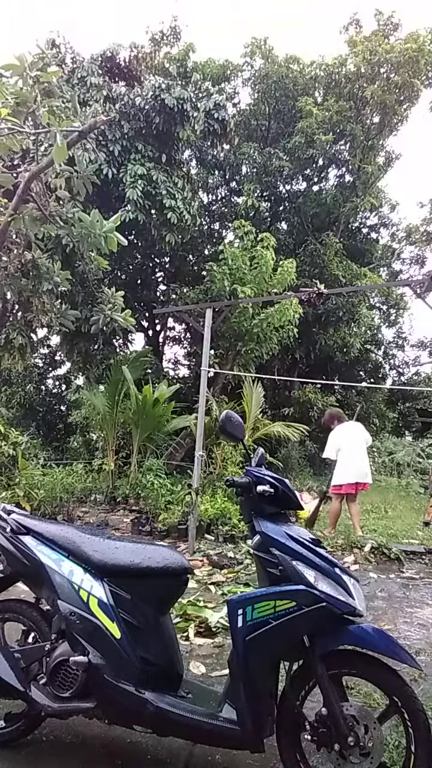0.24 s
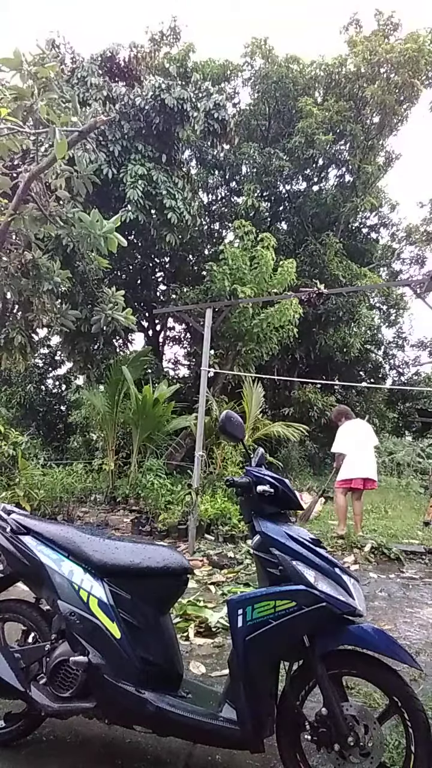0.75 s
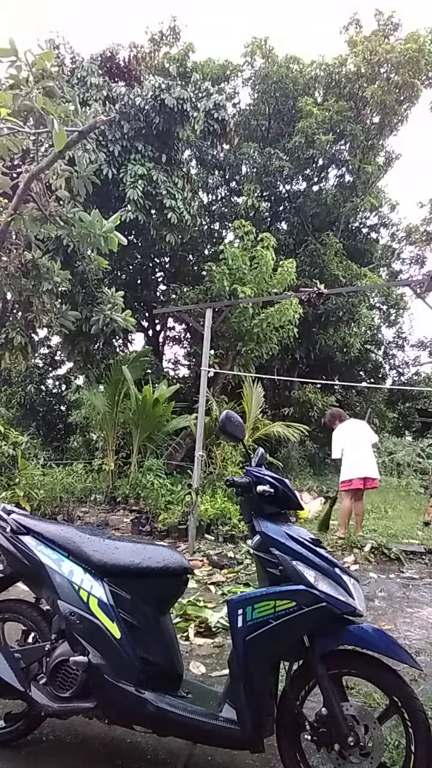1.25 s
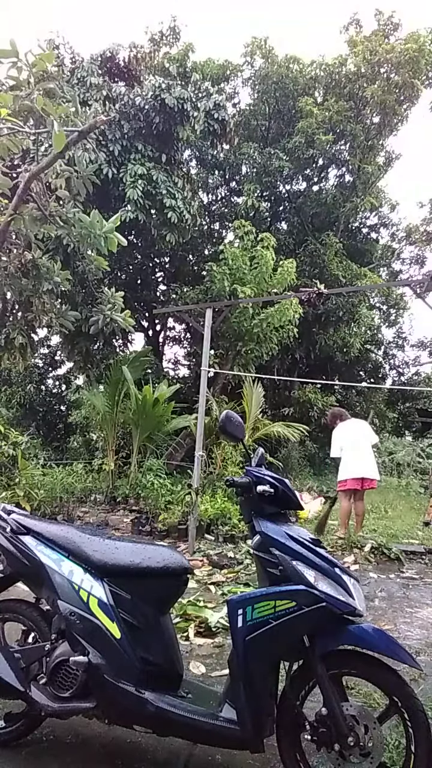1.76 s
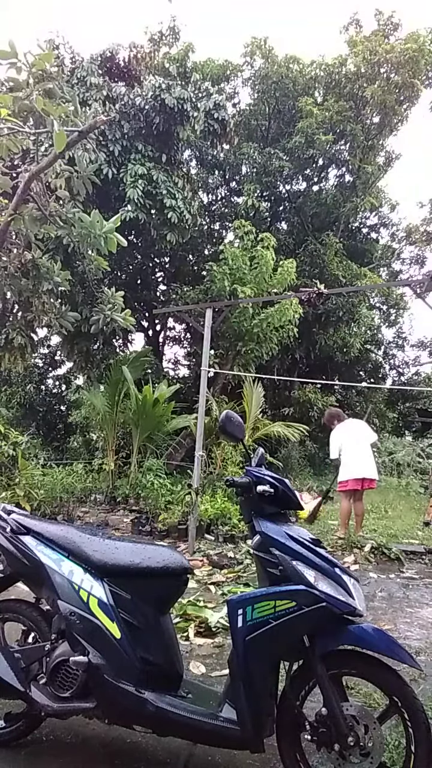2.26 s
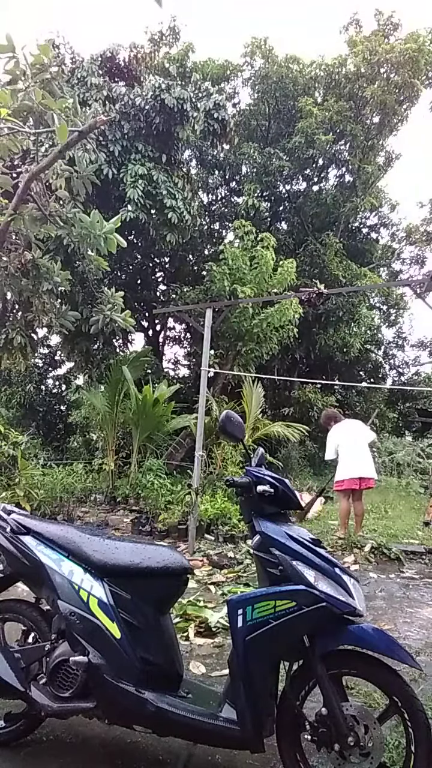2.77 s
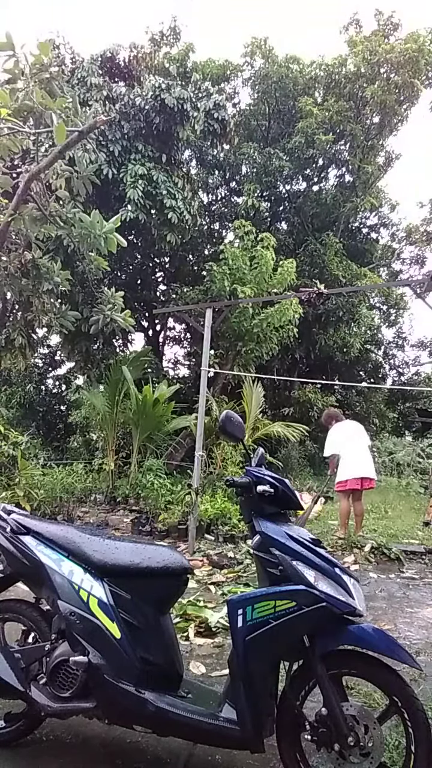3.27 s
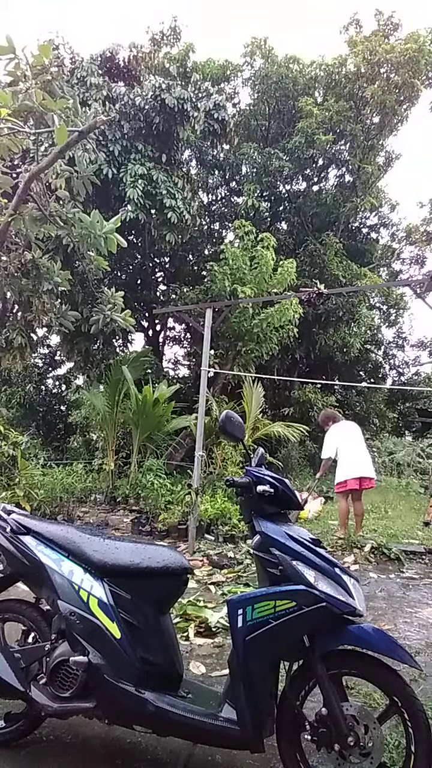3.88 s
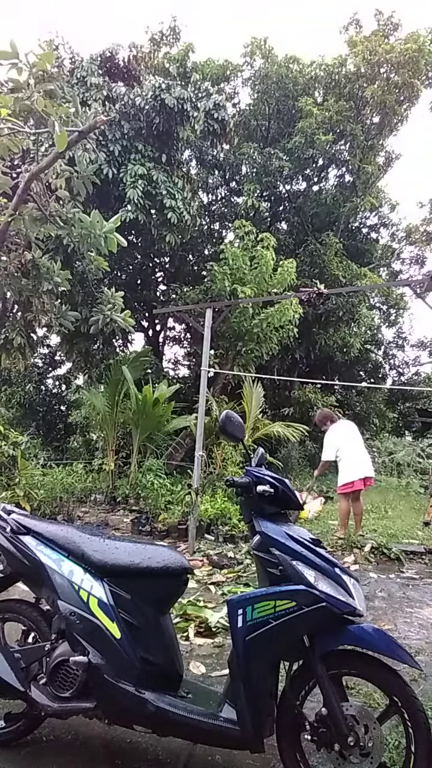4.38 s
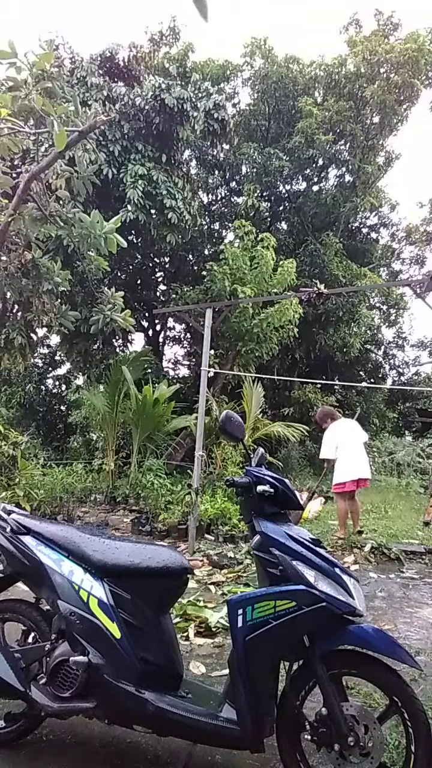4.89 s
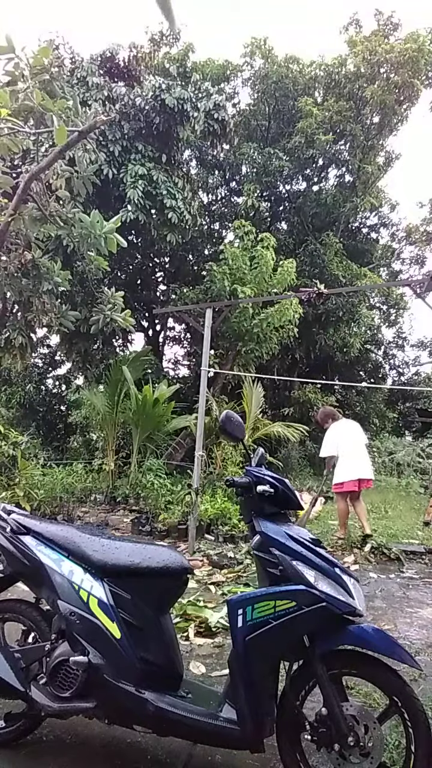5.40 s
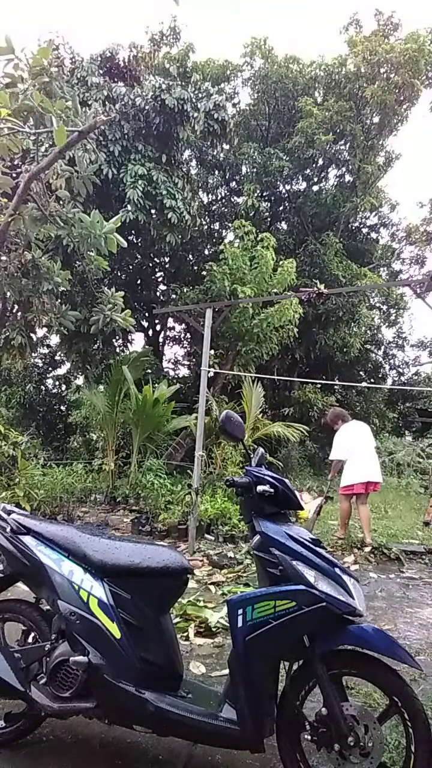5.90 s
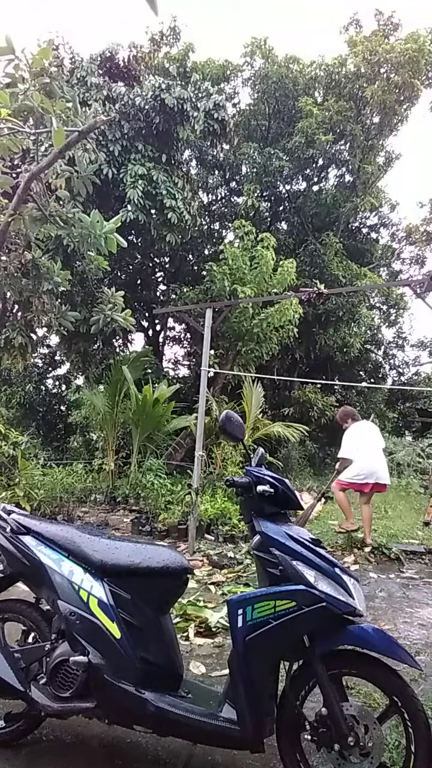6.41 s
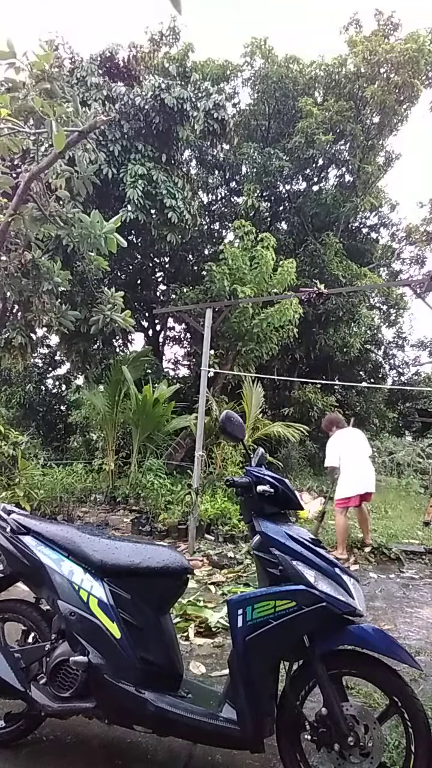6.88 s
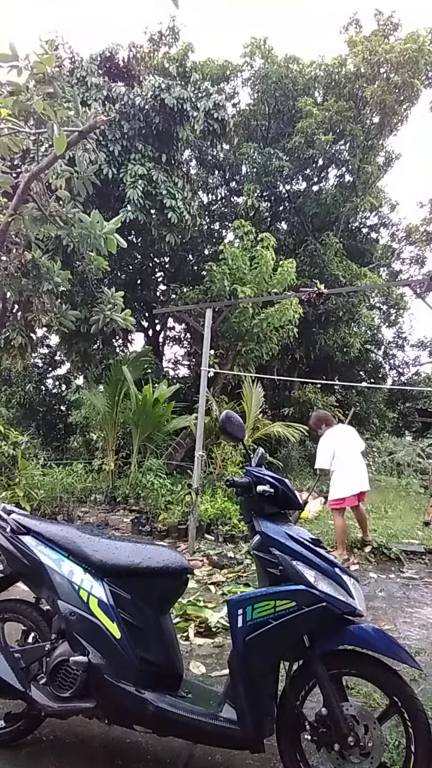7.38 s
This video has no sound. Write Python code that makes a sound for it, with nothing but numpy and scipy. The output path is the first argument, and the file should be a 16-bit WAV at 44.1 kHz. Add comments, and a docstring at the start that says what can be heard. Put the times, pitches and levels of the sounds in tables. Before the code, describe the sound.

Outdoors in a rainy yard, a stiff broom scrapes wet leaves and grit some metres away, about twelve uneven, dry, crackly strokes with short gaps. Rain hisses and drums on a roof behind it, broken into watery flickering patches by noise reduction. A few bright drops ping close by, and one soft thud bumps the microphone midway. Faint steady hiss underneath.

```python
"""In a yard near a roof, a stiff broom sweeps wet leaves some metres from a phone while steady rain falls.
The broom is a mass of tiny clicks; rain, roof drumming and rumble are shaped noise. The phone's noise
suppressor lets only flickering patches of them through, and tones of wandering phase flare up among them.
Near drops ping and splash, one dull knock hits the phone, and a faint hiss lies under all.
Of the phone's two microphone ports, the left hears more middle and the right more treble."""
import sys
import numpy as np
from scipy import signal
from scipy.fft import rfft, irfft, next_fast_len
from scipy.io import wavfile
from scipy.ndimage import uniform_filter1d, map_coordinates

SR = 44100
rng = np.random.default_rng(int(sys.argv[2]) if len(sys.argv) > 2 else 0)


def to_wav(s):
    """Save 16-bit WAV."""
    ch = np.atleast_2d(s).T  # columns
    pcm = np.round(np.clip(ch, -1, 1) * 32767)  # PCM
    wavfile.write(sys.argv[1], SR, pcm.astype(np.int16))


N = 337365  # length in samples

# broom strokes before the suppressor: full contact from t/s, rise t/s, hold t/s, fall t/s,
# scrape level/dB, hiss level/dB relative to the scrape
BROOM_STROKES = [(0.0, 0.19, 0.0021, 0.1, -44.5, 3.5), (0.425, 0.21, 0.044, 0.15, -45, 1),
                 (1.388, 0.052, 0.078, 0.038, -53, 7.5), (1.822, 0.053, 0.13, 0.2, -45, 2),
                 (2.704, 0.34, 0.03, 0.13, -50.5, 7), (2.961, 0.018, 0.015, 0.096, -47.5, 3),
                 (3.06, 0.1, 0.073, 0.27, -45, 2.5), (3.897, 0.24, 0.027, 0.18, -39.5, -1.5),
                 (4.572, 0.22, 0.09, 0.27, -44, 3), (5.344, 0.17, 0.027, 0.26, -44.5, 2.5),
                 (5.951, 0.076, 0.069, 0.29, -51.5, 6.5), (7.025, 0.32, 0.061, 0.3, -38.5, -2)]
# colour of the bristle clicks: f/Hz, level/dB
BRISTLE_COLOUR = [(880, -43), (1500, -42), (2150, -4), (2480, -14), (2860, 7.5), (3490, 3), (4470, 11.5),
                  (5100, 10), (12100, 4.5), (14500, -4.5)]
STROKE_EDGE_DB, STROKE_CURVE = 31.5, 1.27  # loss at the end of a rise or fall; how round the shoulders are

# near drops: t/s, ping level/dB, pitch f/Hz, time for the splash to fall 60 dB t/s,
# splash level/dB and wide tick level/dB relative to the drop, splash spread as a pitch ratio
NEAR_DROPS = [(1.005, -36, 5760, 0.2, -7.5, -30, 1.12), (1.265, -48, 3350, 0.05, -2, -3, 1.1),
              (2.191, -45, 8900, 0.17, -10, 3, 1.12), (4.96, -50, 11600, 0.18, -15.5, -13, 1.08),
              (5.198, -38.5, 6940, 0.11, -12, 2, 1.12), (5.86, -47, 6300, 0.06, -1, -12, 1.09),
              (6.213, -44, 5660, 0.061, -10, -23, 1.08), (6.366, -34.5, 4970, 0.32, -8.5, -37, 1.157),
              (6.869, -39, 6090, 0.2, -5.5, -23, 1.09), (7.349, -54, 9250, 0.23, -5, 10, 1.12)]
PING_RISE_S, PING_T60_S = 0.0012, 0.022  # T60: time to fall 60 dB
TICK_RISE_S, TICK_T60_S = 0.007, 0.04
CRACKLE_DB, CRACKLE_S = 2, 0.0018  # a splash breaks into grains: how uneven, and how long

# one dull knock on the phone
THUMP_S, THUMP_DB, THUMP_HZ, THUMP_T60_S = 3.386, -38.5, 113, 0.066

# loud narrow patches that flare through: start t/s, pitch f/Hz, level/dB, nominal length t/s
LOUD_FLARES = [(0.01, 1940, -55.5, 0.034), (0.118, 705, -55, 0.068), (0.12, 1386, -56.5, 0.04),
               (0.17, 1237, -61, 0.084), (0.265, 1996, -50, 0.04), (0.4, 890, -57, 0.068),
               (0.585, 2970, -59.5, 0.096), (0.715, 676, -58, 0.095), (0.835, 2530, -52, 0.019),
               (0.86, 1750, -54.5, 0.036), (0.259, 1130, -53, 0.13), (0.285, 5020, -56.5, 0.1),
               (0.399, 2580, -54.5, 0.06), (0.419, 4250, -63, 0.062), (0.418, 1390, -47.5, 0.036),
               (0.452, 683, -53, 0.06), (0.466, 1374, -51.5, 0.12), (0.554, 1456, -48, 0.11),
               (0.611, 1680, -48.5, 0.044), (0.831, 1840, -47, 0.021), (0.956, 5560, -58, 0.11),
               (0.956, 7300, -55, 0.04), (0.957, 10000, -58.5, 0.15), (0.955, 670, -53, 0.021),
               (0.955, 1678, -53, 0.053), (0.985, 673, -52.5, 0.049), (1.015, 480, -57, 0.048),
               (1.04, 940, -63, 0.025), (1.098, 2380, -58, 0.028), (1.098, 2830, -64, 0.13),
               (1.1, 1162, -47.5, 0.038), (1.108, 1370, -48.5, 0.093), (1.097, 1893, -49, 0.061),
               (1.14, 8300, -53, 0.042), (1.205, 1050, -57.5, 0.032), (1.215, 3600, -54, 0.03),
               (1.245, 2250, -61.5, 0.15), (1.251, 3590, -56, 0.079), (1.345, 2820, -58.5, 0.032),
               (1.365, 2045, -53, 0.048), (1.44, 1095, -54, 0.021), (1.44, 1980, -57, 0.04),
               (1.55, 950, -60, 0.042), (1.55, 1720, -63, 0.096), (1.62, 1800, -52.5, 0.073),
               (1.62, 2690, -60.5, 0.04), (1.255, 1463, -44.5, 0.037), (1.379, 695, -54.5, 0.066),
               (1.43, 3800, -57, 0.1), (1.592, 937, -51.5, 0.045), (1.621, 1568, -50, 0.05),
               (1.809, 1140, -46.5, 0.052), (1.82, 5600, -54, 0.11), (1.91, 4450, -54, 0.09),
               (1.937, 7000, -54, 0.056), (2.218, 1612, -47.5, 0.044), (2.28, 2680, -55.5, 0.082),
               (2.28, 5750, -60, 0.11), (2.285, 1492, -43.5, 0.053), (2.326, 1470, -45.5, 0.096),
               (2.482, 5750, -58, 0.031), (2.495, 2720, -55.5, 0.056), (2.5, 4950, -56, 0.1),
               (2.525, 1744, -47, 0.042), (2.488, 1700, -57, 0.058), (2.49, 1980, -57, 0.04),
               (2.545, 455, -48, 0.092), (2.56, 1150, -54, 0.04), (2.62, 923, -58, 0.065),
               (2.6, 11800, -58, 0.037), (2.705, 2095, -60, 0.074), (2.765, 1690, -58.5, 0.051),
               (2.81, 1415, -56.5, 0.084), (2.84, 1820, -59, 0.033), (2.855, 904, -55, 0.025),
               (2.885, 1570, -56, 0.025), (2.96, 1706, -62, 0.2), (2.965, 2250, -59, 0.045),
               (3.14, 800, -53, 0.031), (3.18, 1550, -55, 0.05), (3.225, 2300, -55, 0.11),
               (3.355, 2000, -52, 0.028), (3.36, 1720, -52, 0.034), (3.415, 1340, -51, 0.053),
               (3.515, 670, -51, 0.036), (3.63, 2300, -60, 0.085), (2.645, 474, -51.5, 0.034),
               (2.82, 610, -56.5, 0.061), (2.96, 1435, -53, 0.078), (2.975, 1125, -48, 0.039),
               (3.02, 202, -58, 0.058), (3.082, 2684, -48, 0.066), (3.097, 215.4, -48, 0.15),
               (3.21, 374.5, -52, 0.12), (3.236, 2635, -52, 0.21), (3.252, 5860, -53.5, 0.054),
               (3.26, 1710, -47.5, 0.051), (3.312, 1500, -49.5, 0.091), (3.344, 406, -50.5, 0.05),
               (3.377, 570, -49.5, 0.036), (3.425, 100.5, -47, 0.11), (3.515, 1148, -48.5, 0.084),
               (3.547, 449, -48.5, 0.073), (3.624, 1927, -51, 0.038), (3.633, 782, -48, 0.031),
               (3.722, 1157, -49.5, 0.17), (3.759, 397.6, -52, 0.22), (3.763, 4960, -50, 0.068),
               (3.768, 7200, -56, 0.061), (3.806, 1910, -48.5, 0.057), (3.854, 405.8, -50.5, 0.22),
               (3.9, 3040, -50.5, 0.12), (3.976, 1355, -50, 0.047), (3.994, 334, -49.5, 0.074),
               (4.011, 1168, -47.5, 0.082), (4.082, 667, -52, 0.085), (4.108, 469, -52.5, 0.11),
               (3.93, 2300, -50.5, 0.037), (4.065, 1964, -53, 0.05), (4.135, 1720, -55, 0.033),
               (4.187, 1730, -51, 0.032), (4.195, 1405, -55, 0.06), (4.235, 1750, -56, 0.043),
               (4.29, 1130, -62, 0.04), (4.305, 2134, -60.5, 0.073), (4.41, 112, -57, 0.018),
               (4.516, 416, -52, 0.056), (4.36, 1660, -55.5, 0.053), (4.575, 1676, -51.5, 0.067),
               (4.575, 2340, -57, 0.08), (4.575, 4480, -51, 0.066), (4.63, 1544, -52, 0.12),
               (4.635, 1340, -56, 0.05), (4.675, 2040, -50.5, 0.069), (4.685, 1158, -51, 0.096),
               (4.71, 1695, -56, 0.083), (4.81, 1670, -53.5, 0.071), (4.717, 815, -51.5, 0.063),
               (4.764, 1130, -49, 0.042), (4.892, 1696, -52, 0.035), (4.95, 1352, -48.5, 0.085),
               (5.068, 950, -51, 0.044), (5.121, 1144, -49, 0.033), (5.181, 757, -51.5, 0.096),
               (5.196, 4900, -47, 0.02), (5.2, 2860, -56, 0.023), (5.229, 1150, -47.5, 0.085),
               (5.198, 1546, -49.5, 0.063), (5.249, 2640, -49, 0.068), (5.252, 1940, -46, 0.047),
               (4.875, 897, -57.5, 0.025), (4.965, 1840, -55, 0.025), (5.15, 1804, -50.5, 0.06),
               (5.225, 479, -56, 0.061), (5.315, 1110, -48, 0.028), (5.325, 1850, -52, 0.06),
               (5.33, 794, -50, 0.065), (5.35, 1385, -54, 0.057), (5.395, 465, -55, 0.047),
               (5.44, 1665, -55, 0.06), (5.46, 687, -61, 0.12), (5.515, 485, -54, 0.042),
               (5.56, 1440, -64.5, 0.08), (5.58, 723, -54, 0.04), (5.62, 1125, -63, 0.073),
               (5.665, 1685, -53, 0.023), (5.7, 385, -54.5, 0.043), (5.79, 2660, -56.5, 0.038),
               (5.8, 503, -55.5, 0.03), (5.82, 1395, -53, 0.054), (5.875, 472, -53.5, 0.042),
               (5.62, 714, -52, 0.12), (5.696, 2450, -57.5, 0.077), (5.77, 1200, -45, 0.048),
               (5.768, 1950, -54, 0.065), (5.777, 1567, -53.5, 0.097), (5.88, 1510, -51.5, 0.045),
               (5.93, 1930, -53.5, 0.1), (6.03, 1510, -55, 0.026), (6.035, 862, -60, 0.054),
               (6.15, 1730, -51, 0.04), (6.215, 1158, -57, 0.11), (6.225, 100, -55.5, 0.071),
               (6.23, 2970, -59, 0.049), (6.285, 1653, -49.5, 0.04), (6.33, 1494, -54, 0.11),
               (6.525, 2250, -57.5, 0.045), (6.63, 2030, -58, 0.042), (6.645, 2370, -62, 0.044),
               (6.71, 2666, -57, 0.066), (6.755, 1540, -53, 0.045), (6.15, 1237, -50.5, 0.037),
               (6.364, 662, -51, 0.06), (6.431, 1360, -49.5, 0.17), (6.43, 3230, -52.5, 0.03),
               (6.456, 2970, -59, 0.071), (6.529, 469, -49.5, 0.061), (6.532, 1166, -50, 0.15),
               (6.707, 555, -50, 0.047), (6.746, 1950, -50, 0.038), (6.753, 571, -53.5, 0.05),
               (6.827, 848, -46, 0.015), (6.868, 3690, -51.5, 0.039), (6.863, 2710, -51, 0.026),
               (6.912, 237.6, -56, 0.21), (6.92, 2800, -56, 0.041), (6.956, 1560, -53, 0.031),
               (6.962, 596, -52.5, 0.034), (6.97, 1320, -52, 0.025), (7.015, 2080, -51.5, 0.11),
               (7.035, 2800, -52, 0.068), (7.08, 2470, -55, 0.081), (7.14, 239, -66, 0.12),
               (7.17, 545, -57, 0.049), (7.26, 1640, -58, 0.032), (7.29, 1280, -53, 0.032),
               (7.34, 204, -57, 0.1), (7.345, 1130, -57, 0.027), (7.505, 1070, -56, 0.053),
               (7.56, 1386, -53.5, 0.093), (7.6, 1164, -56.5, 0.11), (7.015, 257, -53.5, 0.13),
               (7.123, 1360, -47, 0.018), (7.225, 5160, -59, 0.043), (7.225, 3660, -59, 0.12),
               (7.33, 3640, -63.5, 0.2), (7.446, 6560, -58, 0.098), (7.52, 3740, -62, 0.1),
               (7.339, 1900, -49, 0.064), (7.45, 2050, -45, 0.034), (7.435, 2620, -51.5, 0.026),
               (7.459, 1686, -51, 0.056), (7.517, 731, -45, 0.033), (7.529, 2890, -51, 0.15)]
WEAK_FLARES, WEAK_HZ = 60, (680, 2200)  # how many weak flares; their pitch range
WEAK_DB, WEAK_S = (-62, -56.5), (0.04, 0.11)  # ranges of their level and length
FLUTTER, STEADY_S = 0.82, 0.41  # flutter depth of the shortest flares; length over which it shrinks

# slow level of the background before LIFT_DB: t/s, drone level/dB, roof drumming level/dB,
# rain hiss level/dB, upper hiss level/dB relative to the rain hiss
YARD_LEVEL = [(0.0, -52, -54, -58.5, 7.5), (0.43, -70.5, -56.5, -57, 4.5), (1.96, -72, -59, -64, -15.5),
              (2.53, -62.5, -57, -68, 11.5), (2.56, -55, -72, -62, -8), (2.94, -72, -55.5, -66.5, -2),
              (3.22, -61, -57.5, -55, -6.5), (3.41, -43, -53, -66, -21), (3.52, -62.5, -66, -68, 15),
              (3.58, -37, -55.5, -60.5, -19), (3.68, -73, -52.5, -75.5, 2), (3.77, -43.5, -61.5, -70, 8.5),
              (3.94, -45.5, -50.5, -59, 14), (4.06, -63, -54, -66.5, 6), (4.32, -72, -58.5, -66.5, -3),
              (4.56, -57, -58, -60, -40), (5.05, -76.5, -55.5, -66, 1), (5.26, -54, -54.5, -53.5, -5.5),
              (5.94, -57, -60, -65, -5), (6.2, -89, -54.5, -61.5, -9), (6.56, -56, -59.5, -69, 1.5),
              (6.69, -82, -50, -69, -6), (6.71, -66, -70, -61, -3), (6.84, -85, -47, -68, -14),
              (7.01, -64, -54.5, -46.5, 8.5), (7.37, -45.5, -53, -61.5, -2), (7.65, -77, -61.5, -62, -24)]
# slow level of the far rumble before LIFT_DB: t/s, level/dB
FAR_RUMBLE_LEVEL = [(0.0, -70), (0.04, -55), (0.77, -55.5), (0.81, -50), (0.94, -72), (1.45, -54),
                    (1.49, -71), (2.43, -76.5), (2.85, -63), (2.96, -79), (3.26, -45.5), (3.37, -60),
                    (3.39, -47.5), (3.68, -57.5), (4.6, -68.5), (4.79, -57), (5.39, -70.5), (5.69, -51),
                    (6.03, -62.5), (6.07, -55), (7.01, -66), (7.05, -56), (7.5, -56), (7.65, -53)]
# colour of the far rumble: f/Hz, level/dB
RUMBLE_COLOUR = [(18, -51), (30, -35), (50, -5), (66, 0), (86, 4), (115, -0.5), (170, -21), (220, -39),
                 (370, -120)]
# colour of the low drone: f/Hz, level/dB
DRONE_COLOUR = [(100, -56), (170, -11.5), (280, 1), (389, 6), (465, 7.5), (581, -1.5), (620, -6.5),
                (810, -60), (1360, -120)]
# roof resonances: f/Hz, width f/Hz, level/dB
ROOF_MODES = [(662, 97, 19.5), (1132, 74, 24.5), (1410, 146, 25.5), (1653, 94, 20.5)]
# colour of the rain hissing on leaves: f/Hz, level/dB
RAIN_COLOUR = [(1350, -79), (2300, 8), (2680, 9), (4230, 8.5), (4890, 9.5), (5800, 9.5), (6410, 7.5),
               (11800, -1), (13400, -2.5), (14500, -30)]
HISS_SPLIT_HZ = 8300  # border between lower and upper rain hiss
# colour of the faint, held-down rain: f/Hz, level/dB
BED_COLOUR = [(71, 0), (120, 4), (284, -12.5), (1530, -3), (1700, 12), (2480, -14.5), (5760, -26),
              (8440, -67), (11400, -13.5), (13400, -47), (14500, -56)]

# the whole background sags and comes back: back at t/s, length t/s before DIP_STRETCH,
# depth level/dB before DIP_SHARE
BACKGROUND_DIPS = [(0.122, 0.13, 3), (0.191, 0.2, 6), (0.271, 0.065, 7.5), (0.396, 0.085, 7),
                   (0.695, 0.092, 5), (0.957, 0.12, 4.5), (1.103, 0.026, 18), (1.25, 0.078, 4),
                   (1.368, 0.029, 3.5), (1.544, 0.025, 5.5), (1.587, 0.19, 1), (1.803, 0.095, 5.5),
                   (2.045, 0.0091, 14), (2.195, 0.096, 2.5), (2.28, 0.038, 3.5), (2.444, 0.035, 6),
                   (2.493, 0.032, 7), (2.665, 0.024, 4), (2.829, 0.019, 4), (2.946, 0.014, 4.5),
                   (3.044, 0.021, 4), (3.521, 0.032, 5.5), (3.614, 0.073, 2.5), (3.738, 0.031, 5),
                   (4.332, 0.057, 8), (4.433, 0.0076, 16), (4.899, 0.089, 3.5), (4.958, 0.049, 6),
                   (5.064, 0.043, 6), (5.122, 0.024, 2), (5.2, 0.058, 3.5), (5.673, 0.1, 5.5),
                   (5.78, 0.017, -0.5), (5.94, 0.056, 2), (6.147, 0.034, 5.5), (6.218, 0.016, 9.5),
                   (6.327, 0.044, 5.5), (6.723, 0.03, 15), (6.823, 0.025, 7), (7.346, 0.1, 4.5),
                   (7.446, 0.099, 4.5)]
DIP_RETURN_S, DIP_STRETCH = 0.0054, 1.96  # time to come back; factor on the listed length
SURGE, SURGE_S = 0.052, 0.0091  # overshoot after a dip as a share of its depth; how long it lasts
# one value each for rumble, drone, roof, lower hiss, upper hiss, faint rain:
DIP_SHARE = 0.49, 2.3, 1.45, 2.73, 3, 2.2  # how deeply each follows the dips
DIP_BLUR_S = 0.001, 0.001, 0.001, 0.016, 0.012, 0.004  # how softly each follows them
LIFT_DB = -0.7, -3, -4.5, 5.4, 9, -1.4  # added to the slow level
FLICKER_DB, FLICKER_RATE = (2.5, 5.1, 4.85, 4.45, 3.1, 1.5), 12  # random swells; knots a second

# colour of the even hiss under all: f/Hz, level/dB
FLOOR_COLOUR = [(100, 5.5), (250, -1), (600, -6), (1500, -3), (3000, -4.5), (6000, -12.5), (11000, -22.5),
                (14300, -20)]
FLOOR_DB = -70.5

# how alike left and right are, 1 for the same; below 0 counts as 0: f/Hz, likeness
PORT_LIKENESS = [(60, 1), (130, 0.97), (290, 0.95), (620, 0.81), (1360, -0.29), (2960, 0.094), (6470, -0.6),
                 (14100, -0.42)]
# left port minus right port: f/Hz, level/dB
PORT_DIFFERENCE = [(60, 2.5), (110, 0), (200, 1.5), (370, 0), (680, 3), (1250, 7), (2290, 4.5), (4190, 2.5),
                   (7690, 1.5), (14100, -22.5)]
TOP_HZ, LOW_CUT_HZ = 14280, 40  # limits of what is heard


def broom():
    """Bristles flick over grit and leaves: dense tiny clicks of uneven size, in a scrape and a hiss range."""
    clicks = at_ports(rng.standard_normal((2, N)) * amp(1.8 * rng.exponential(size=N)))
    upper = lambda hz: 1 / (1 + (7500 / (hz + 1)) ** 6)
    colour = coloured(BRISTLE_COLOUR)
    scrape = unit(filtered(clicks, lambda hz: colour(hz) * (1 - upper(hz))))
    hiss = unit(filtered(clicks, lambda hz: colour(hz) * upper(hz)))
    low, high, t = np.zeros(N), np.zeros(N), np.arange(N) / SR
    for s, rise, hold, fall, scrape_db, hiss_db in BROOM_STROKES:
        # 0 in full contact, growing as the bristles land and lift gradually
        off = np.maximum(np.maximum((s - t) / rise, (t - s - hold) / fall), 0)
        contact = amp(scrape_db - STROKE_EDGE_DB * off ** STROKE_CURVE)
        low += contact
        high += amp(hiss_db) * contact
    uneven = amp(0.25 * wobble(40))
    # firm strokes pass whole; light strokes and the ends of strokes break into streaks
    rasp = suppressed(uneven * low * scrape, over=2.4, floor_db=-14, memory_s=0.032, size=1024)
    swish = suppressed(uneven * high * hiss, over=1.5, floor_db=-14, memory_s=0.03, size=1024)
    return rasp + swish


def drops():
    """Each drop pings at its pitch and leaves a short splash of noise around it, some with a wider tick."""
    out, t = np.zeros((2, N + SR)), np.arange(SR // 5) / SR
    for s, db, hz, t60, splash_db, tick_db, spread in NEAR_DROPS:
        edges = [hz / spread, min(hz * spread, TOP_HZ)]
        band = signal.butter(3, edges, "band", fs=SR, output="sos")
        noise = rng.standard_normal((2, len(t)))
        bumps = uniform_filter1d(rng.standard_normal(len(t)), size=round(CRACKLE_S * SR))
        grains = amp(CRACKLE_DB * unit(bumps))
        ping = 1.1 * amp(-60 * t / PING_T60_S) * np.sin(2 * np.pi * hz * t)
        splash = amp(splash_db - 60 * t / t60) * unit(signal.sosfilt(band, grains * noise))
        tick = amp(tick_db - 60 * t / TICK_T60_S) * noise * np.minimum(t / TICK_RISE_S, 1)
        rise = 1 - np.exp(-t / PING_RISE_S)
        at = round(s * SR)
        out[:, at:at + len(t)] += amp(db) * rise * (ping + splash + tick)
    return filtered(out[:, :N], lambda hz: hz > 2000)


def thump():
    """A knock is a low tone that fades quickly, alike in both ports."""
    t = np.maximum(np.arange(N) / SR - THUMP_S, 0)
    return 2.1 * amp(THUMP_DB - 60 * t / THUMP_T60_S) * np.sin(2 * np.pi * THUMP_HZ * t)


def flares():
    """The loud flares, and weak ones at random that sink with the dips."""
    low, high = np.transpose([(0, N / SR), np.log(WEAK_HZ), WEAK_DB, WEAK_S])
    s, log_hz, db, length = (low + (high - low) * rng.random((WEAK_FLARES, 4))).T
    loud = flare(LOUD_FLARES)
    weak = flare(zip(s, np.exp(log_hz), db, length))
    return loud + amp(dips_db()) * weak


def flare(rows):
    """Each flare is a tone of wandering phase that rises fast, flutters and fades."""
    out = np.zeros((2, N + SR))
    for s, hz, db, length in rows:
        t = np.arange(round(min(1.26 * length, 0.49) * SR)) / SR
        steps = np.repeat(rng.standard_normal((2, SR // 16)), repeats=8, axis=1)[:, :len(t)]
        phase = 0.016 * np.cumsum(steps, 1) + rng.uniform(0, 2 * np.pi, (2, 1))
        beat_hz, beat_phase = rng.uniform((20, 0), (50, 2 * np.pi))
        depth = FLUTTER * np.exp(-length / STEADY_S)  # longer flares flutter less
        flutter = 1 + depth * np.sin(2 * np.pi * beat_hz * t + beat_phase)
        shape = np.sin(np.pi * (t / t[-1]) ** 0.42) ** 1.56 * flutter
        tone = np.sqrt(2) * np.sin(2 * np.pi * hz * t + phase)
        at = round(s * SR)
        out[:, at:at + len(t)] += amp(db) * shape * tone
    return at_ports(out[:, :N])


def roof_response(hz):
    """The roof rings in a few broad resonances, whose powers add up."""
    power = sum(amp(2 * db) / (1 + (2 * (hz - centre) / width) ** 2) for centre, width, db in ROOF_MODES)
    return np.sqrt(power) * (hz > 600) * (hz < 2500)


def background(gains):
    """Far rumble, a low drone, rain drumming in the roof's resonances and rain hissing on leaves."""
    rumble = steady(coloured(RUMBLE_COLOUR), over=0.088, floor_db=-8, memory_s=0.0056)
    drone = steady(coloured(DRONE_COLOUR), over=0.95, floor_db=-21, memory_s=0.045)
    roof = steady(roof_response, over=1.05, floor_db=-24, memory_s=0.045)
    hiss = steady(coloured(RAIN_COLOUR), over=1.12, floor_db=-30, memory_s=0.05, size=1024)
    upper = filtered(hiss, lambda hz: 1 / (1 + (HISS_SPLIT_HZ / (hz + 1)) ** 4))
    layers = rumble, drone, roof, hiss - upper, upper
    return sum(gain * layer for gain, layer in zip(gains, layers))


def bed(gain):
    """The faint, streaky remainder of the rain under everything: suppressed noise at a changing level."""
    return gain * steady(coloured(BED_COLOUR), over=1.1, floor_db=-26, memory_s=0.035, size=1024)


def floor():
    """An even, faint hiss that never dips: plain coloured noise."""
    noise = at_ports(rng.standard_normal((2, N)))
    return amp(FLOOR_DB) * unit(filtered(noise, coloured(FLOOR_COLOUR)))


def levels():
    """Gains of the five background layers and the faint rain: slow level, shared dips and a flicker each."""
    drone_db, roof_db, hiss_db, upper_db = curves(YARD_LEVEL)
    rumble_db, = curves(FAR_RUMBLE_LEVEL)
    # the faint rain follows the slow level of the roof
    slow = rumble_db, drone_db, roof_db, hiss_db, hiss_db + upper_db, roof_db
    dip, gains = dips_db(), []
    for db, lift, share, blur, flicker in zip(slow, LIFT_DB, DIP_SHARE, DIP_BLUR_S, FLICKER_DB):
        sag = share * uniform_filter1d(dip, size=round(blur * SR))
        gains.append(amp(db + lift + sag + flicker * wobble(FLICKER_RATE)))
    return gains


def dips_db():
    """Each dip sinks steadily, returns quickly and overshoots a little."""
    t, out = np.arange(N) / SR, np.zeros(N)
    for back, length, depth_db in BACKGROUND_DIPS:
        bottom = back - DIP_RETURN_S
        times = [bottom - DIP_STRETCH * length, bottom, back, back + SURGE_S]
        out += np.interp(t, times, [0, -depth_db, SURGE * depth_db, 0])
    return out


def steady(colour, over, floor_db, memory_s, size=512):
    """Steady noise after the suppressor, then coloured, at rms 1."""
    noise = at_ports(rng.standard_normal((2, N)))
    return unit(filtered(suppressed(noise, over, floor_db, memory_s, size), colour))


def suppressed(x, over, floor_db, memory_s, size=512):
    """Each narrow band passes only while it stands above its own long mean; both sides share the gain."""
    hop = size // 4
    bands = signal.stft(x, nperseg=size, noverlap=size - hop)[2]

    def lag(v, s):
        keep = np.exp(-hop / SR / s)
        return signal.lfilter([1 - keep], [1, -keep], v)

    power = uniform_filter1d(lag(np.abs(bands.sum(0)) ** 2, memory_s), size=2, axis=0) + 1e-20
    gain = np.clip(1 - over * power.mean(1, keepdims=True) / power, amp(floor_db), 1)
    gain = np.maximum(gain, lag(gain, 0.0019))  # opens at once, closes more slowly
    return signal.istft(bands * gain, nperseg=size, noverlap=size - hop)[1][:, :N]


def at_ports(pair):
    """Two unrelated signals mixed to the likeness of the two microphone ports."""
    turn = lambda hz: np.arccos(np.clip(along(PORT_LIKENESS, hz), 0, 1)) / 2
    mid, side = filtered(pair, lambda hz: np.array([np.cos(turn(hz)), np.sin(turn(hz))]))
    return np.array([mid + side, mid - side])


def wobble(rate):
    """A smooth random curve, rate knots a second and 40 at most."""
    knots = rng.standard_normal(int(N / SR * 40) + 4)
    return map_coordinates(knots, [np.arange(N) * min(rate, 40) / SR])


def amp(db):
    """Gain of a level in dB."""
    return 10 ** (np.asarray(db) / 20)


def unit(x):
    """x at rms 1."""
    return x / np.sqrt(np.mean(x ** 2) + 1e-20)


def along(points, hz):
    """Values between (f/Hz, value) points, read along a log pitch axis."""
    f, v = np.transpose(points)
    return np.interp(np.log(hz + 1), np.log(f + 1), v)


def coloured(points):
    """Response of frequency that follows (f/Hz, level/dB) points."""
    return lambda hz: amp(along(points, hz))


def curves(rows):
    """One value per sample for each column after the time."""
    s, *columns = np.transpose(rows)
    return [np.interp(np.arange(N) / SR, s, column) for column in columns]


def filtered(x, response):
    """x times a response of frequency."""
    m = next_fast_len(N + SR // 4)
    return irfft(rfft(x, m) * response(np.fft.rfftfreq(m, 1 / SR)), m)[..., :N]


def scene():
    """Broom, rain, drops and knock together."""
    *gains, faint = levels()
    return broom() + background(gains) + flares() + bed(faint) + drops() + thump() + floor()


def record(dry):
    """The two ports differ in colour; the deepest bass is cut and nothing is kept above the band limit."""
    def response(hz):
        tilt = amp(np.outer([0.5, -0.5], along(PORT_DIFFERENCE, hz)))
        bass_cut = 1 / (1 + (LOW_CUT_HZ / (hz + 1)) ** 4)
        return tilt / np.mean(tilt, 0) * (hz < TOP_HZ) * bass_cut

    return filtered(dry, response)


dry = scene()
out = record(dry)
to_wav(out)
```